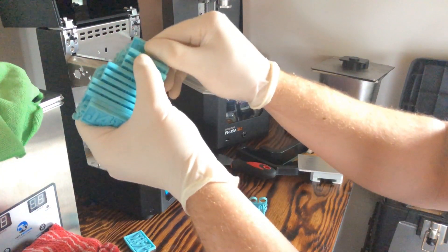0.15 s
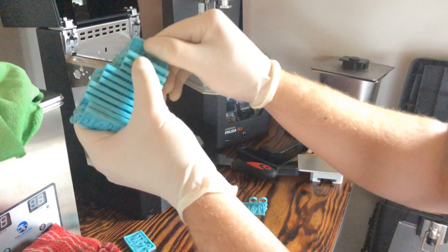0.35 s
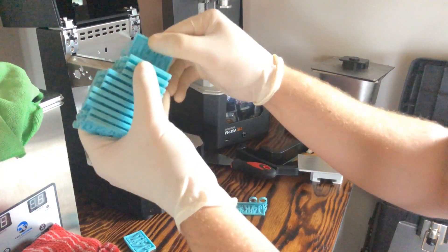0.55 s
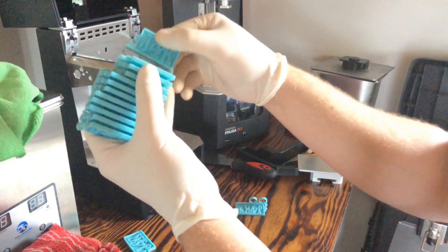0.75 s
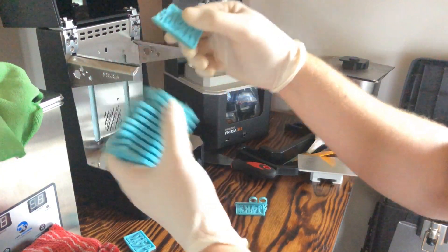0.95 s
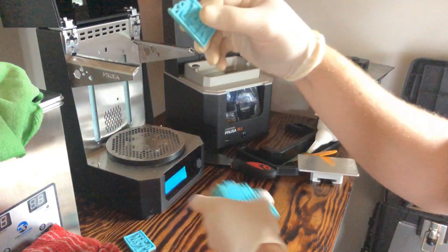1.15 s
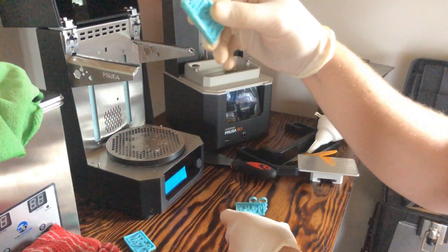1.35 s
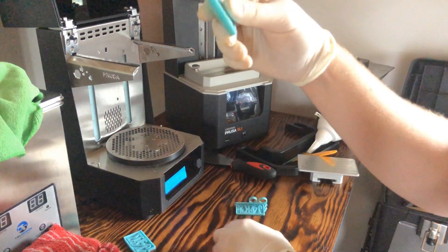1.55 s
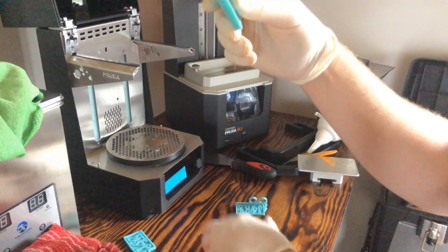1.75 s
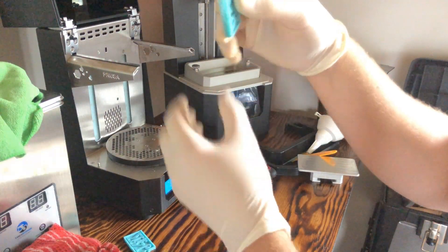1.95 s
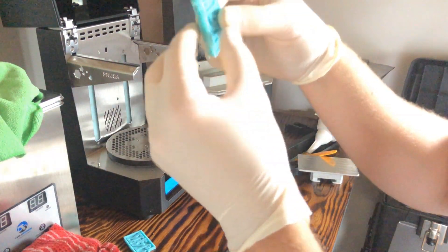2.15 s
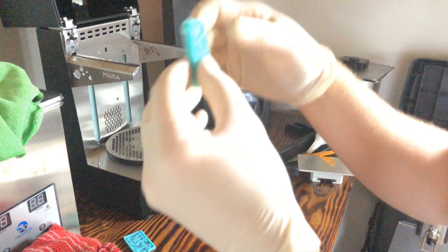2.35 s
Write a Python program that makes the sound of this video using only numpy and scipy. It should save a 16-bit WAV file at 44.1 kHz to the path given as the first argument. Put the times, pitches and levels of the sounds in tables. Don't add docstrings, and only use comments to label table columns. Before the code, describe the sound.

Four sharp plastic cracks come quickly, then a weaker snap and light clicks as small supports let go; a part knocks on a wooden bench. Close microphone, low steady fan, short bright room echo.

```python
import sys
import numpy as np
from scipy import signal
from scipy.io import wavfile
from scipy.ndimage import uniform_filter1d

SR = 44100
rng = np.random.default_rng(int(sys.argv[2]) if len(sys.argv) > 2 else 0)


def boost(x):
    u = np.asarray(x, float) / 20
    return 10 ** u


def transcribe(u):
    v = np.clip(np.atleast_2d(u).T, -1, 1)
    q = np.round(v * 32767).astype(np.int16)
    wavfile.write(sys.argv[1], SR, q)


N = 105840

# freq_hz, density_db_per_hz
WASH_SPECTRUM = [(26, -41.5), (45, -0.5), (309, -1), (559, -9), (1580, -11.5), (4800, -25.5), (12600, -34),
                 (15800, -33.5), (16150, -70.5)]
# time_s, level_db
GLOVE_HISS = [(0, -84), (.15, -96), (.85, -63.5), (1.05, -68.5), (1.3, -79.5), (1.5, -70.5), (1.75, -74),
              (2.1, -71), (2.4, -72.5)]
# freq_hz, t60_s
ROOM_DECAY = [(200, 0.56), (1000, 0.51), (3000, 0.58), (6000, 0.47), (10000, 0.37), (16000, 0.31)]

# start_s, level_db, start_hz, end_hz, glide_s
BUMPS = [
    (0.5609, -41, 1696, 166, 0.0018),
    (1.2943, -49, 1240, 240, 0.0022),
    (1.317, -53, 1480, 277, 0.00176),
    (1.33, -55, 600, 260, 0.0013),
]
# start_s, level_db, hardness_hz, hollow_db, bench_db
KNOCKS = [
    (1.55, -43.5, 2540, 10, 6),
    (1.639, -50.5, 1980, 15.5, 2.5),
    (1.8224, -47.5, 1970, 12, -0.5),
    (1.8424, -32.5, 4000, 3.5, -25),
    (1.8452, -30, 3800, 7, -6.5),
    (1.8693, -36.5, 3560, 3, -9),
]
# freq_hz, level_db, t60_s
BENCH_MODES = [(120.7, -8, 0.19), (171.3, 0, 0.15), (219.6, -3.5, .3), (491.7, -12, 0.27)]
# freq_hz, level_db, t60_s
HOLLOW_MODES = [(816, -2.5, 0.054), (906, 2.5, 0.051), (870, -10, 0.2), (1328, -5, 0.036), (1795, -8, 0.02),
                (2985, -13, .024), (3530, -18, 0.03)]
# freq_hz, level_db, t60_s
PANEL_MODES = [(313, -10, .5), (585, -12, .15)]
# freq_hz, density_db_per_hz
KNOCK_SENT = [(59, -35), (100, -13), (307, -2), (423, -5), (836, -4.5), (1130, -9.5), (1270, -2),
              (4070, -24), (12000, -52), (15600, -66), (22000, -120)]
# freq_hz, width_hz, level_db
KNOCK_BODY = [(596, 90, -2), (873, 110, 2.5), (1263, 100, -2), (1880, 260, 1), (2640, 95, 2),
              (4020, 220, 9)]

# centre_s, half_length_s, level_db, centre_hz
RUSTLES = [(.937, .01, -45.5, 9500), (0.995, 0.022, -57.5, 2200), (1.018, 0.0065, -56, 5100),
           (1.115, 0.0086, -56, 6700), (1.187, 0.012, -56.5, 4000), (1.403, 0.014, -61, 2460),
           (1.401, .012, -65, 6800), (1.633, 0.013, -60.5, 6180), (1.799, 0.0088, -59.5, 5100),
           (2.061, 0.0087, -62, 6800), (2.145, .01, -68.5, 8970), (1.535, 0.0091, -67, 4500),
           (2.364, 0.012, -59, 8000)]
# start_s, level_db, pitch_hz, t60_s
PINGS = [(0.078, -43.5, 4200, 0.019), (0.64, -17, 3300, 0.011), (.4248, -14, 15000, .008),
         (.398, -17, 11500, .008), (.209, -17.5, 11000, .007), (.4255, -19, 4000, 0.023),
         (.652, -17.5, 6000, 0.013), (1.871, -32.5, 1400, 0.057), (0.69, -61, 410, 0.053),
         (1.55, -49, 1600, 0.042), (.9065, -49, 5100, .012), (.9435, -39.5, 1950, 0.015),
         (.9535, -43, 5600, .012), (0.94, -52, 2360, .04), (1.022, -49, 5500, .025), (1, -52, 2400, .05),
         (1.851, -29.5, 2650, 0.04), (1.867, -42.5, 3800, .05)]
# start_s, peak_db,
# centre_hz, t60_s
TICKS = [(.075, -25.5, 8200, 0.0085), (0.9314, -37, 7810, 0.011), (0.943, -13.5, 10600, 0.0049),
         (0.952, -31, 11200, 0.016), (0.996, -35, 5200, 0.006), (1.0193, -32.5, 5000, 0.0069),
         (1.117, -24, 6300, 0.0072), (1.1836, -27, 7500, 0.0061), (1.2344, -30, 11400, 0.011),
         (1.5492, -32, 2920, 0.025), (1.6196, -30.5, 6350, 0.015), (1.6367, -32.5, 2980, 0.013),
         (1.7918, -28.5, 6800, 0.005), (2.0576, -46, 6970, 0.0077), (2.14, -39.5, 11320, 0.011),
         (2.3513, -29, 11000, 0.0054), (2.3624, -26, 8200, 0.0075),
         (.946, -28, 9500, 0.012), (.81, -49, 13900, .0054), (.963, -41, 11000, .0044),
               (0.9409, -30, 9000, 0.0071), (1.0285, -40, 13600, .005), (1.113, -40, 13000, 0.0054),
               (1.1202, -33, 12900, 0.0086), (1.399, -39.5, 9600, 0.016), (1.5716, -46, 15000, .006),
               (1.628, -46, 6000, .008), (2.178, -53.5, 11000, 0.0043), (2.194, -46, 7500, .005),
               (2.207, -40.5, 11000, 0.0045), (2.216, -48, 11000, .005),
         (.185, -30, 6000, .005), (.1968, -34, 6000, .004), (.915, -38, 8000, .004),
                (1.8414, -28, 6000, .014), (1.8677, -24, 4200, .018), (1.852, -33, 6000, .01)]

# break_s, peak_db, t60_s, fissure_db, splinter_db
SNAPS = [
    (.2095, -2.5, .0027, -34, -17),
    (.3985, -5, .003, -16, -10),
    (.4252, -4, .0027, -20, -17),
    (.6521, -6, .006, -15, -9),
    (1.1516, -18.5, .004, -30, -14),
]
# room_db, first_wall_db, bench_scatter_db
SNAP_SENDS = [(-19, 2, -9), (-31, -9, -4), (-19.5, -4, -9), (-24.5, -5, -5), (-28.5, -19, 0)]
# freq_hz, density_db_per_hz
CRACK_A = [(290, -89), (500, -42.5), (1030, -42), (3770, 8), (5710, 8.5), (7440, 6), (13000, 10),
           (15300, -2.5), (17000, -30)]
CRACK_B = [(290, -62), (500, -26), (2150, -18), (3560, -3.5), (4780, -8), (8370, -7.5), (11100, 3),
           (15300, -6), (17000, -17.5)]
CRACK_C = [(290, -60), (500, -34), (1470, -31.5), (3770, -10.5), (8370, -10.5), (9700, 3.5), (12500, -26.5),
           (15100, -3.5), (17000, -32.5)]
CRACK_D = [(470, -57), (800, -24.5), (1860, -21), (3390, -4.5), (8100, -1), (9320, 2), (12300, -6),
           (15500, -6), (17000, -17)]
CRACK_E = [(880, -28), (1500, -35.5), (4820, -15.5), (8700, -16), (15000, -6), (16000, -29), (17000, -41)]
# freq_hz, density_db_per_hz
SENT_A = [(410, -68), (700, -35.5), (987, -30.5), (3650, -10.5), (6450, -3.5), (7770, -10.5), (15200, -6),
          (15900, -25.5), (16500, -31)]
SENT_C = [(350, -54), (600, -20.5), (2370, -14.5), (3900, -5.5), (4610, -7), (9610, -4.5), (15000, -2),
          (15800, -2), (16500, -33.5)]
SENT_D = [(880, -31.5), (1500, -13.5), (2400, -16), (3090, 0.5), (4570, -3), (8680, 0.5), (10400, -1.5),
          (15400, 2.5), (16500, -48.5)]
# freq_hz, width_hz, level_db
SNAP_BODIES = [
    [(3730, 250, 0), (5670, 300, 0.5), (6350, 210, -1.5), (10400, 400, 2.5)],
    [(3700, 300, 3), (11000, 600, -6.5)],
    [(4000, 200, 3), (6400, 250, 3.5), (8890, 250, -0.5), (9950, 530, 3)],
    [(3100, 350, -2.5), (3900, 250, 2.5), (6010, 340, -7), (8800, 250, 4)],
    [(3800, 400, -13), (14600, 800, -3)],
]

WALL_DELAY_S, SCATTER_DB, TAIL_TOP_HZ = .0115, -8, 15950


def evened(x):
    return x / np.sqrt(np.mean(x ** 2) + 1e-20)


def peaked(x):
    return x / np.max(abs(x))


def read(points, hz):
    table_hz, value = np.transpose(points)
    return np.interp(np.log(hz + 1), np.log(table_hz + 1), value)


def add(mix, start_s, sound):
    part = mix[round(start_s * SR):][:len(sound)]
    part += sound[:len(part)]


def band(x, order, low_hz, high_hz):
    return signal.sosfilt(signal.butter(order, [low_hz, high_hz], "band", fs=SR, output="sos"), x)


def colour(x, points):
    hz = abs(np.fft.fftfreq(1024, 1 / SR))
    log_gain = np.log(boost(read(points, hz)))
    phase = -signal.hilbert(log_gain).imag
    taps = np.fft.ifft(np.exp(log_gain + 1j * phase)).real[:512]
    return signal.oaconvolve(x, taps)[:len(x)]


def resonate(x, hz, width_hz):
    return signal.lfilter(*signal.iirpeak(hz, hz / width_hz, SR), x)


def burst(t60_s, size=2048):
    return rng.standard_normal(size) * boost(-60 * np.arange(size) / SR / t60_s)


def spike(height):
    return height * (np.arange(2048) == 1)


def ring(modes, t):
    return sum(boost(db - 60 * t / t60_s) * np.sin(2 * np.pi * hz * t) for hz, db, t60_s in modes)


def air():
    wash_db, hum_db, hum_hz, hum_width_hz, patch_db = -61.5, -69, 312, 35, 1.2
    hz = np.fft.rfftfreq(1024, 1 / SR)
    real, imag, patches = rng.standard_normal((3, len(hz), N // 256 + 5))
    patches = uniform_filter1d(patches, size=12, axis=1)
    patches = evened(uniform_filter1d(patches, size=10, axis=0))
    gain = boost(read(WASH_SPECTRUM, hz)[:, None] + patch_db * patches)
    wash = signal.istft((real + 1j * imag) * gain, nperseg=1024, noverlap=768)[1][:N]
    hum = resonate(rng.standard_normal(N), hum_hz, hum_width_hz)
    hum = resonate(hum, hum_hz, hum_width_hz)
    return boost(wash_db) * evened(wash) + boost(hum_db) * evened(hum)


def gloves():
    time_s, level_db = np.transpose(GLOVE_HISS)
    hiss = band(rng.standard_normal(N), 6, 4000, TAIL_TOP_HZ)
    return boost(np.interp(np.arange(N) / SR, time_s, level_db)) * evened(hiss)


def room(x, scatter_db=SCATTER_DB):
    build_s = .002
    t = np.arange(SR // 2 + SR // 4) / SR
    hz, frame_s, z = signal.stft(rng.standard_normal(len(t)), SR, nperseg=256)
    decay = boost(-60 * frame_s / read(ROOM_DECAY, hz)[:, None])
    z = z * (hz < TAIL_TOP_HZ)[:, None] * decay
    tail = signal.istft(z, SR, nperseg=256)[1][:len(t)]
    wall_rise = np.clip((t - WALL_DELAY_S) / build_s, 0, 1)
    tail = tail * (boost(scatter_db) + (1 - boost(scatter_db)) * wall_rise)
    return signal.fftconvolve(x, tail / np.linalg.norm(tail))


def echo(points, delay_s, body, scatter_db=SCATTER_DB):
    click = colour(1. * (np.arange(1024) == round(delay_s * SR)), points)
    click = click + sum(boost(db) * resonate(click, hz, width_hz) for hz, width_hz, db in body)
    return room(click / np.linalg.norm(click), scatter_db)


def bump(start_s, level_db, start_hz, end_hz, glide_s):
    rise_s, length_s = .0015, .011
    t = np.arange(4096) / SR
    hz = end_hz + (start_hz - end_hz) * np.exp(-t / glide_s)
    wave = np.sin(2 * np.pi * np.cumsum(hz) / SR)
    return start_s, boost(level_db) * wave * np.minimum(t / rise_s, 1) * np.exp(-(t / length_s) ** 2)


def knock(start_s, level_db, hardness_hz, hollow_db, bench_db):
    room_db, clatter_db, clatter_t60_s, rise_s = 19.5, 8.5, .048, .005
    t = np.arange(16384) / SR
    clatter = band(burst(clatter_t60_s, len(t)), 3, 600, hardness_hz)
    rings = boost(bench_db) * ring(BENCH_MODES, t)
    rings = rings + boost(hollow_db) * ring(HOLLOW_MODES, t) + ring(PANEL_MODES, t)
    out = boost(room_db) * echo(KNOCK_SENT, 0, KNOCK_BODY)
    add(out, 0, np.minimum(t / rise_s, 1) * rings + boost(clatter_db) * peaked(clatter))
    return start_s, boost(level_db) * out


def rustle(centre_s, half_s, level_db, hz):
    grains_per_s, spread_db, q = 5000, 3.5, 1.6
    u = np.arange(-2.5, 2.5, 1 / (half_s * SR))
    when, sign, size = rng.random((3, len(u)))
    grains = (when < grains_per_s / SR) * np.sign(sign - .5)
    grains = grains * boost(-spread_db * np.log(size + .05))
    rub = resonate(resonate(grains, hz, hz / q), hz, hz / q)
    return centre_s - 2.2 * half_s, boost(level_db) * evened(rub) * np.exp(-u ** 2)


def ping(start_s, level_db, hz, t60_s):
    rise_s = .00064
    t = np.arange(4096) / SR
    modes = [(hz, level_db, t60_s), (1.04 * hz, level_db - 9.5, t60_s)]
    return start_s, np.minimum(t / rise_s, 1) * ring(modes, t)


def tick(start_s, peak_db, hz, t60_s):
    lag_s, trim_db, wide_db, q, low_hz, top_hz = .001, -6, -4, 2.2, 2300, 14500
    drive = burst(t60_s) + spike(2.6)
    click = resonate(drive, hz, hz / q) + boost(wide_db) * drive
    click = band(click, 2, low_hz, max(top_hz, hz))
    return start_s + lag_s, boost(peak_db + trim_db) * peaked(click)


def snap(break_s, peak_db, t60_s, fissure_db, splinter_db, room_db, wall_db, scatter_db, crack, sent, body):
    lead_s, splinter_delay_s, splinter_longer, wall_t60_s = .0009, .0013, 4, .014
    drive = np.zeros(4096)
    add(drive, 0, boost(fissure_db) * burst(t60_s))
    add(drive, lead_s, burst(t60_s) + spike(2.7))
    add(drive, lead_s + splinter_delay_s, boost(splinter_db) * burst(splinter_longer * t60_s))
    sent_db = peak_db + room_db
    out = boost(sent_db) * 20 * echo(sent, lead_s, body, scatter_db)
    wall = peaked(colour(burst(wall_t60_s), sent))
    add(out, WALL_DELAY_S, boost(sent_db + 9 + wall_db) * wall)
    add(out, 0, boost(peak_db) * peaked(colour(drive, crack)))
    return break_s - lead_s, out


def scene():
    small_room_db, bench_room_db = -10, -12
    mix, small, bench = air() + gloves(), np.zeros(N), np.zeros(N)
    sources = [(bump, BUMPS, bench), (knock, KNOCKS, bench), (rustle, RUSTLES, small), (ping, PINGS, small),
               (tick, TICKS, small)]
    for source, rows, bus in sources:
        for row in rows:
            add(bus, *source(*row))
    colours = [(CRACK_A, SENT_A), (CRACK_B, SENT_C), (CRACK_C, SENT_C), (CRACK_D, SENT_D), (CRACK_E, CRACK_E)]
    for row, send, pair, body in zip(SNAPS, SNAP_SENDS, colours, SNAP_BODIES):
        add(mix, *snap(*row, *send, *pair, body))
    mix = mix + small + bench
    mix = mix + boost(small_room_db) * room(small)[:N] + boost(bench_room_db) * room(bench)[:N]
    return mix[None]


def roll_off(x):
    return signal.sosfilt(signal.butter(12, 17220, fs=SR, output="sos"), x)


def record(dry):
    edge_hz, mic_low_hz = 16800, 46
    taps = signal.firwin(101, edge_hz, window=("kaiser", 8), fs=SR)
    cut = signal.oaconvolve(dry, taps[None], "same")
    cut = signal.sosfilt(signal.butter(2, mic_low_hz, "high", fs=SR, output="sos"), cut)
    return roll_off(cut)


dry = scene()
out = record(dry)
transcribe(out)
```